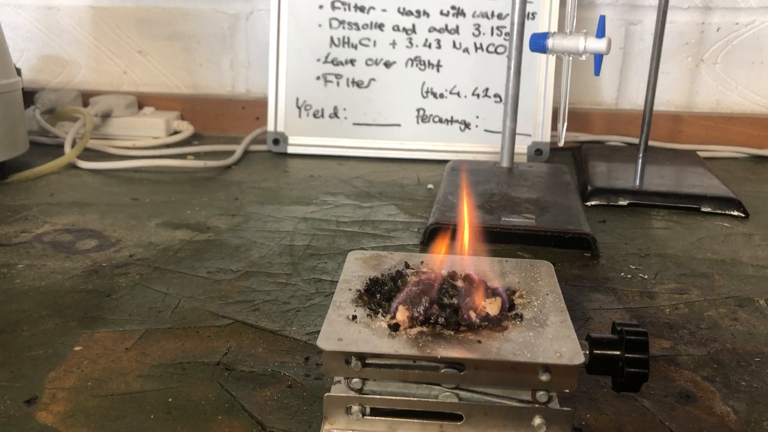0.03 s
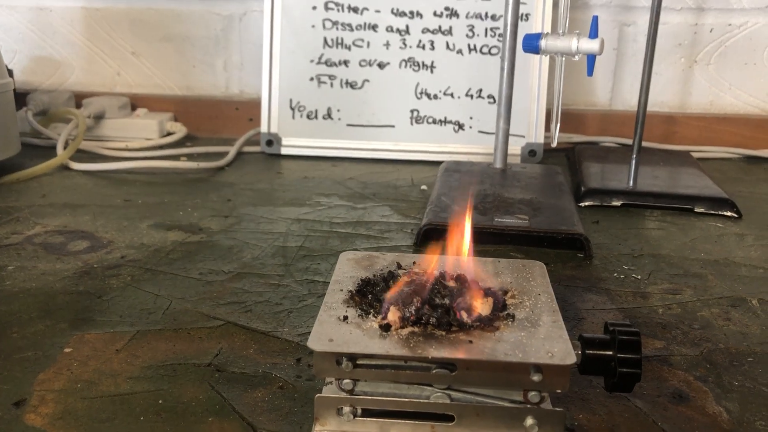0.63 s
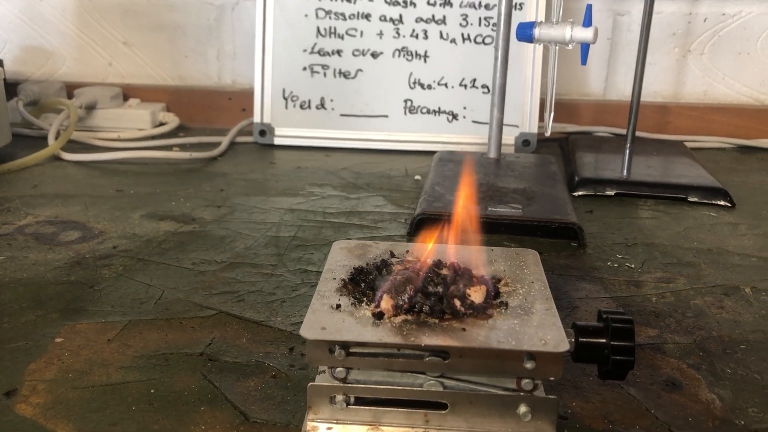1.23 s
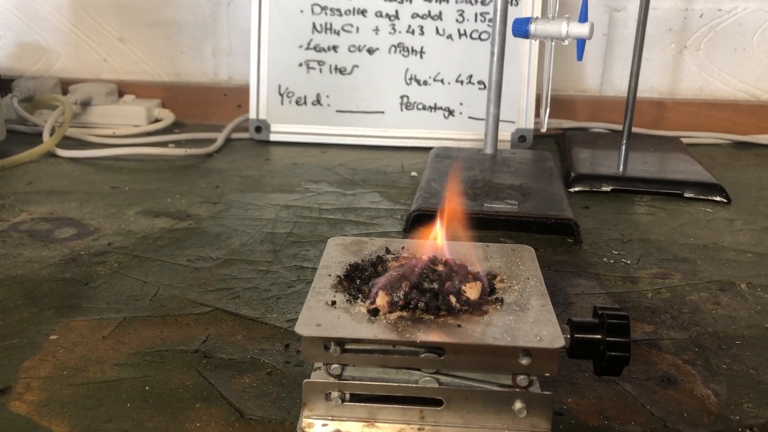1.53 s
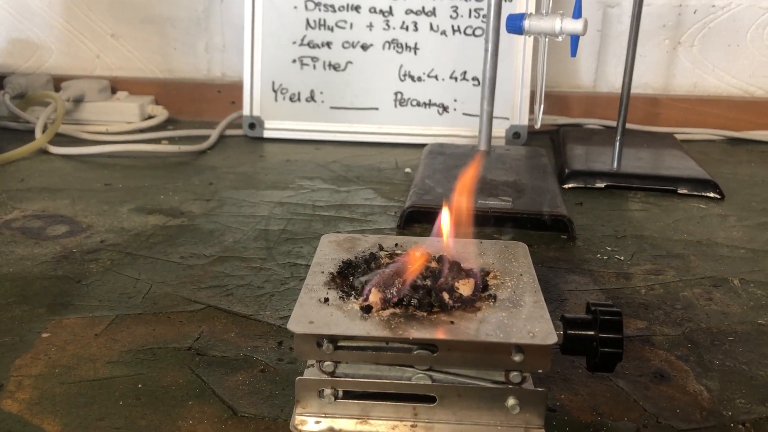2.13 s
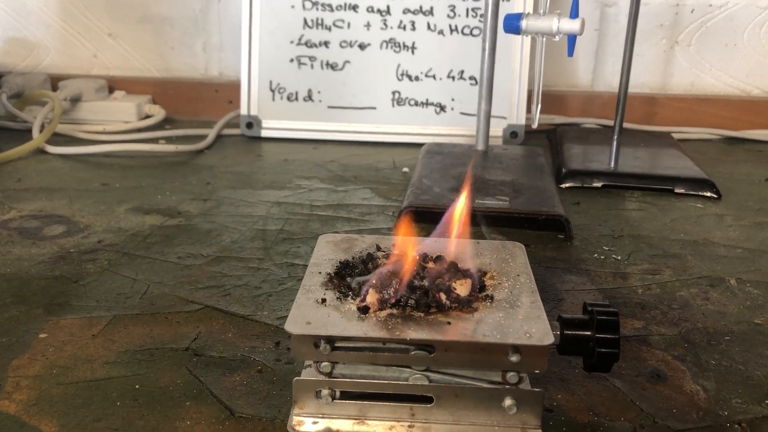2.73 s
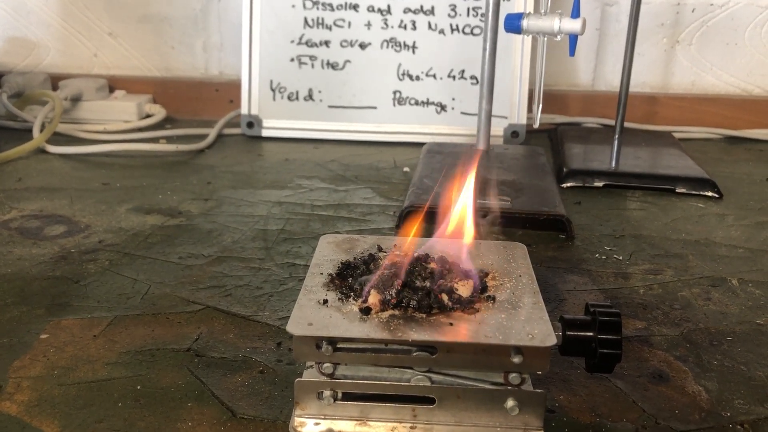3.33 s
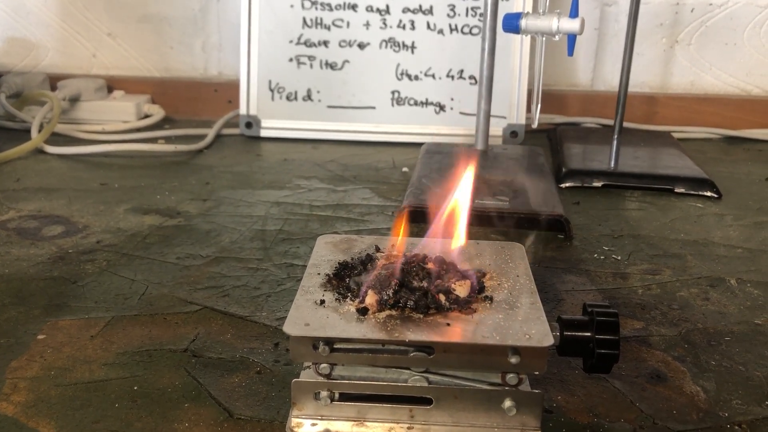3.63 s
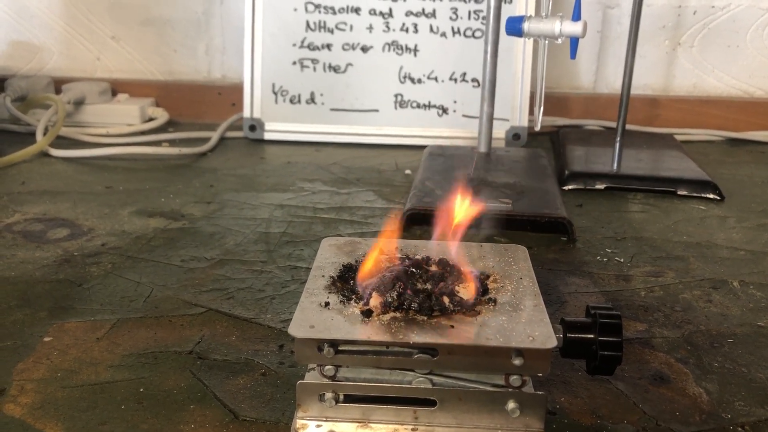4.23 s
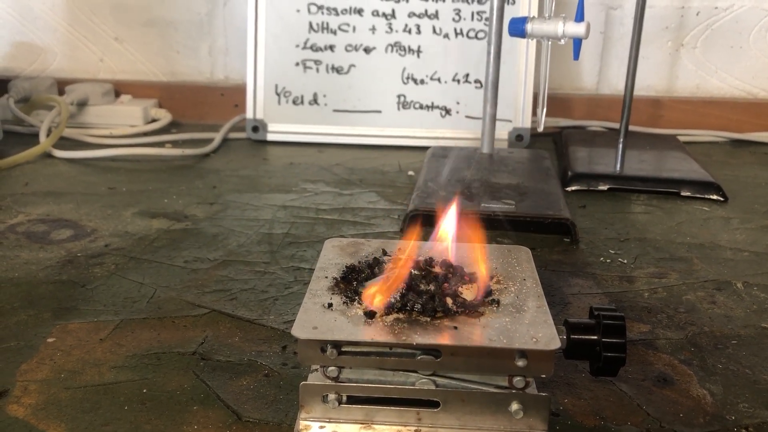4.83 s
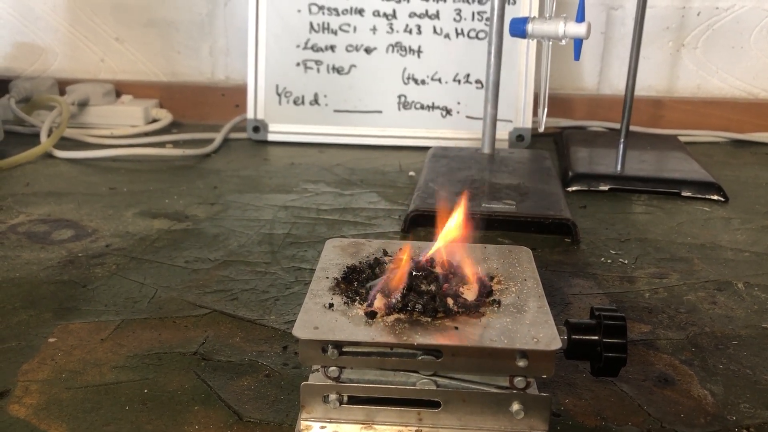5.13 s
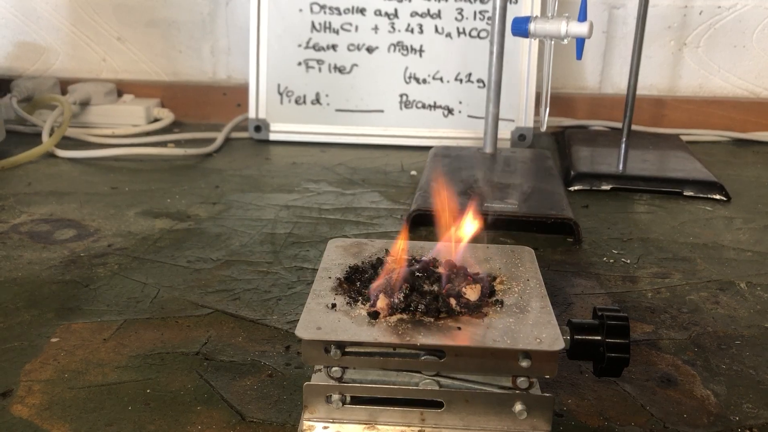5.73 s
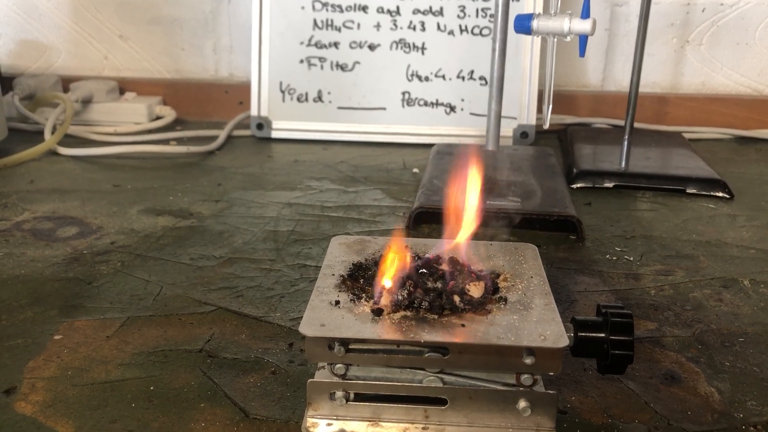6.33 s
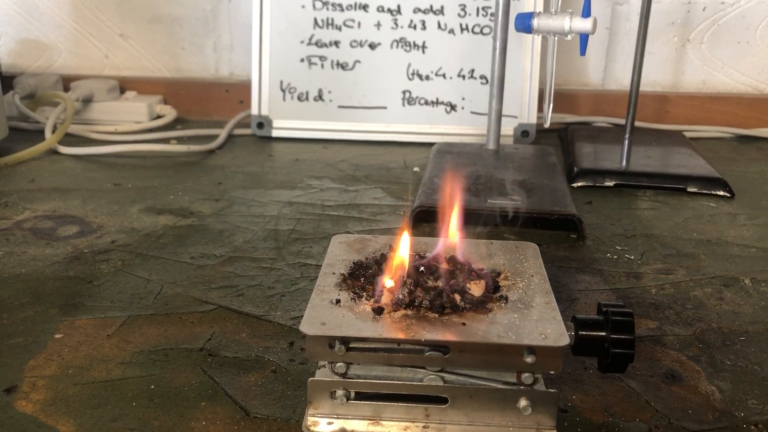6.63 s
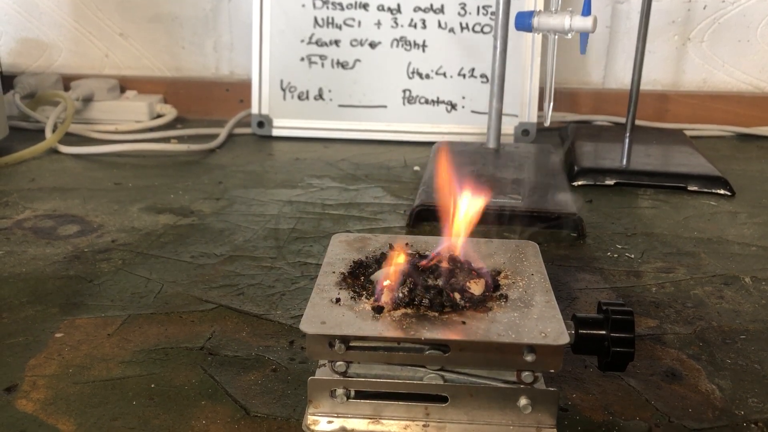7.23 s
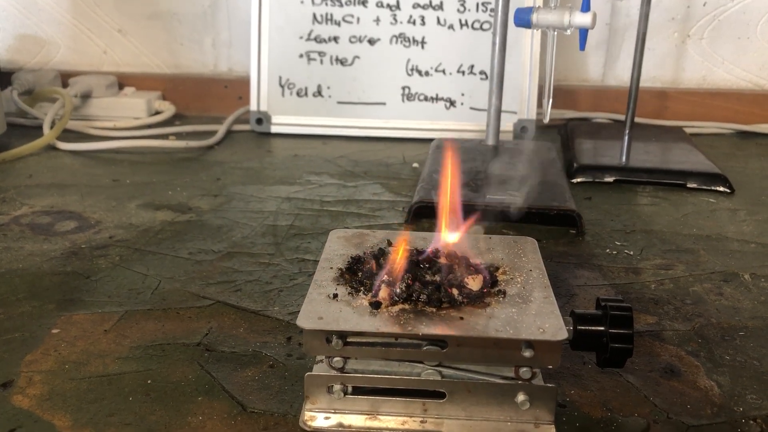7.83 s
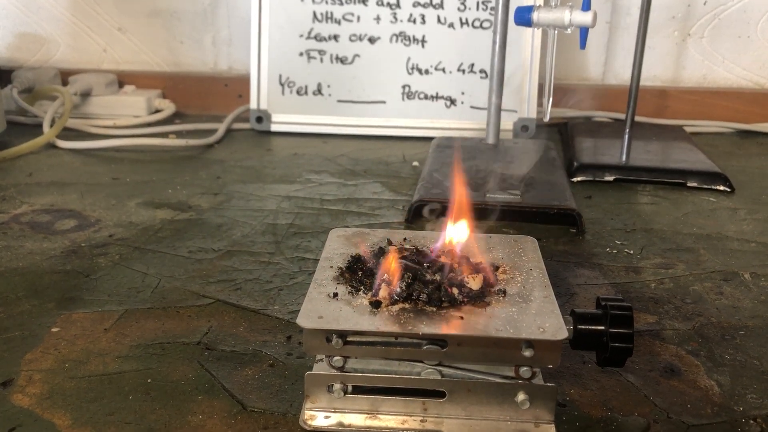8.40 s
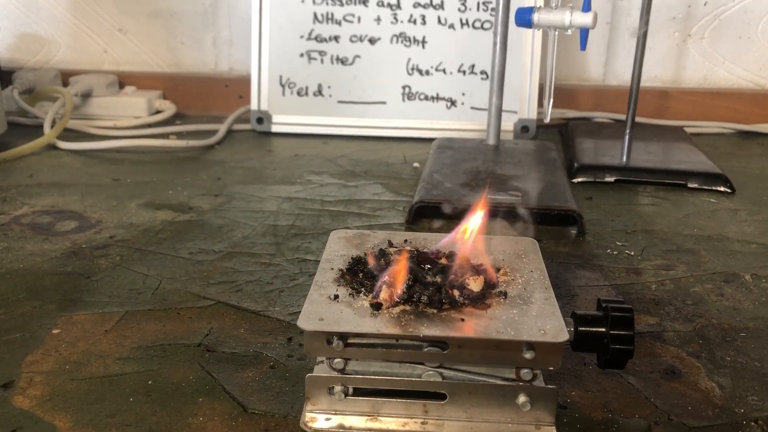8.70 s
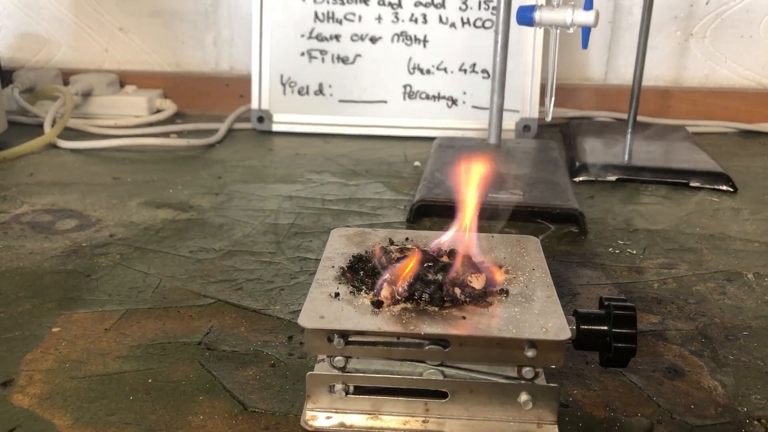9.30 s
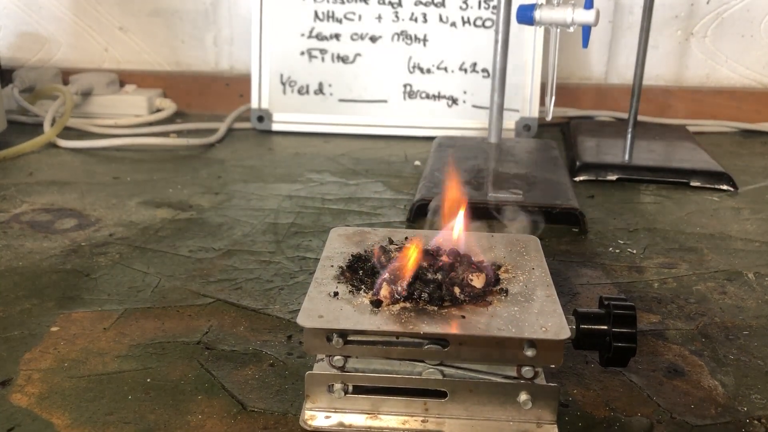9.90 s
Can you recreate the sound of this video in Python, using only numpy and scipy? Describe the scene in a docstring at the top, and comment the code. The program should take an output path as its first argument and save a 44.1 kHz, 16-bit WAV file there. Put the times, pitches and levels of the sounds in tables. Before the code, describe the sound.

A small heap of chemical mix burns on a metal plate in a lab, heard close up. It starts with a faint fizz and a few scattered snaps, then catches and sputters in quick, irregular hissing spurts mixed with dry crackles and tiny ticks. The flame flaps softly underneath, over quiet ventilation and a low hum.

```python
"""Pyrotechnic mix burning on a bench

A small heap burns on a metal plate in a lab, close up. Gas seeps through the melting crust as a fine
fizz and breaks out in short hissing spurts; grains snap in the heat, the crust ticks and the flame
flaps softly. The bench, a board and the walls answer, over quiet ventilation and a low hum."""
import sys
import numpy as np
from scipy import signal
from scipy.fft import rfft, irfft, next_fast_len
from scipy.io import wavfile
from scipy.ndimage import uniform_filter1d, map_coordinates

SR = 44100
rng = np.random.default_rng(int(sys.argv[2]) if len(sys.argv) > 2 else 0)


def dump_mix(stems):
    """Bounce the given channels to the path in sys.argv[1] as a 16-bit WAV at rate SR."""
    frames = np.atleast_2d(stems).T  # one column per channel
    limited = np.clip(frames, -1, 1)  # hard clip at full scale
    pcm = np.round(limited * 32767).astype(np.int16)
    wavfile.write(sys.argv[1], SR, pcm)


N = 439236

# Cue and fader levels are relative: each layer adds its own trim.
# ventilation EQ: freq_hz, gain_db
AIR_EQ = [(15, -49), (26, -17), (37, 6), (55, -4), (85, -8.5), (140, -8), (245, -2), (400, -17), (1000, -9),
          (1500, -19.5), (2700, -27.5), (4700, -20.5), (7000, -25), (11500, -17), (16000, -26)]
# fader ride of the hum: time_s, level_db
HUM_RIDE = [(0.0, -82.5), (1.5, -77.5), (7.0, -75.5), (8.0, -80)]
# the flame's murmur, growing as the heap catches: time_s, level_db
MURMUR_RIDE = [(0.0, -70.5), (1.1, -71), (1.9, -63), (2.7, -67), (4.4, -64.5), (9.96, -63.5)]
# murmur EQ: freq_hz, gain_db
MURMUR_EQ = [(20, -55), (55, -5), (120, -4), (155, -1.5), (190, -4), (270, 0), (375, -8), (475, -4),
             (680, -8.5), (1100, -5.5), (1500, -13.5), (2300, -12.5), (6000, -60)]
# soft flaps of the flame: time_s, level_db
FLAP_CUES = [(0.28, -51.5), (0.574, -54), (1.18, -50.5), (1.565, -55), (2.307, -48), (2.557, -52),
             (3.21, -49.5), (4.297, -44.5), (5.644, -45.5), (7.813, -45), (8.498, -52), (9.431, -50)]
# dull flap EQ: freq_hz, gain_db
FLAP_EQ = [(20, -32), (45, -7), (110, -5), (280, 6.5), (1000, -13.5), (3000, -66)]
# gas flow as the heap smoulders, catches, then burns unevenly: time_s, level_db
FLOW_RIDE = [(0.0, -75.5), (1.55, -74.5), (1.73, -63), (1.98, -61), (2.33, -66.5), (2.85, -61.5),
             (3.2, -57.5), (3.55, -57.5), (3.72, -58), (4.25, -59), (4.6, -54.5), (5.0, -64.5),
             (5.35, -54.5), (6.0, -57.5), (6.7, -55.5), (7.3, -54.5), (7.53, -58), (7.8, -51.5),
             (8.05, -59.5), (8.45, -55), (8.95, -62.0), (9.4, -61.5), (9.96, -62.5)]
# bright EQ of escaping gas: freq_hz, gain_db
JET_EQ = [(60, -56), (500, -26.5), (1500, -14.5), (1900, -8), (2700, -7.5), (3200, -0.5), (4900, 0.5),
          (6500, -7), (8200, -1.5), (10000, 2.5), (11500, 1), (13300, -2.5), (15500, -2)]
# gas spurts: peak_s, level_db, rise_s, drain_s, puff_over_hiss_db, treble_over_mids_db
SPURT_CUES = [(0.205, -58.0, 0.008, 0.37, 1, 2), (1.479, -59.0, 0.053, 0.13, -8, -2.0),
              (1.761, -53.5, 0.02, 0.15, -0.5, -5), (1.801, -56, 0.018, 0.15, -4, -3.5),
              (2.953, -45, 0.002, 0.053, -7.5, 0), (3.063, -42.5, 0.022, 0.06, -5, -7),
              (3.095, -47, 0.005, 0.052, -17, -8), (3.157, -47, 0.028, 0.061, -3.5, -1),
              (3.211, -42.5, 0.0054, 0.15, -7, -4), (3.251, -40.5, 0.0066, 0.12, -8.0, -2.5),
              (3.301, -47.0, 0.016, 0.053, -6.0, -2), (3.372, -39.5, 0.006, 0.079, -10, -2.0),
              (3.427, -43.5, 0.0055, 0.041, -9.0, 4), (3.446, -46, 0.004, 0.05, -13, -5),
              (3.472, -35, 0.007, 0.068, -8.5, 0.5), (3.529, -44.0, 0.006, 0.047, -7.5, -3),
              (3.566, -49.5, 0.02, 0.22, -9.0, 0), (3.621, -50.5, 0.016, 0.12, -6, -2.0),
              (3.773, -46.5, 0.006, 0.044, -7, 1.0), (3.805, -41, 0.0084, 0.035, -12, 3),
              (3.844, -41.5, 0.003, 0.05, -14, -1.5), (3.908, -43.5, 0.012, 0.089, -21, 0),
              (3.96, -45.0, 0.0045, 0.054, -8.0, 2), (4.039, -45.5, 0.0041, 0.2, -12, 1),
              (4.115, -41, 0.0054, 0.034, -10, -1), (4.3, -37.0, 0.0075, 0.14, -4.5, 1),
              (4.394, -36.0, 0.004, 0.12, -9.5, -1.5), (4.426, -44, 0.004, 0.04, -20.0, 2),
              (4.494, -33.5, 0.01, 0.11, -6.5, 4.5), (4.603, -36.5, 0.012, 0.047, -10, 0.0),
              (4.637, -41, 0.004, 0.07, -11.5, 3), (4.706, -37.0, 0.005, 0.11, -9.0, 2),
              (4.75, -26.5, 0.006, 0.034, -19.0, 8.0), (4.853, -47, 0.003, 0.043, -8, -1.0),
              (4.939, -47.5, 0.016, 0.11, -21, -1), (5.046, -38.0, 0.0064, 0.18, -17, 2),
              (5.128, -45.0, 0.005, 0.037, -7, -2.0), (5.225, -41, 0.041, 0.049, -6, -2.5),
              (5.253, -40.5, 0.022, 0.037, -19.0, -2), (5.299, -43.0, 0.002, 0.06, -14, -6),
              (5.31, -39.5, 0.01, 0.13, -10.5, 1), (5.412, -41, 0.003, 0.04, -14.0, -6),
              (5.508, -37.5, 0.005, 0.072, -9, -1.5), (5.557, -41, 0.005, 0.045, -8, -6),
              (5.624, -41.5, 0.004, 0.12, -17, -4), (5.645, -39, 0.007, 0.04, -14, 0),
              (5.708, -38, 0.044, 0.35, -16.5, -1.5), (5.778, -44, 0.003, 0.028, -12.0, -7),
              (5.828, -44, 0.006, 0.19, -11.0, -4.0), (5.871, -47.5, 0.012, 0.19, -17.0, -1.0),
              (5.901, -43, 0.003, 0.06, -21, -3.0), (5.924, -41.0, 0.0033, 0.13, -12, -1.5),
              (5.998, -43.5, 0.003, 0.075, -10, 2), (6.035, -42.0, 0.005, 0.025, -7, -1),
              (6.097, -40.5, 0.0075, 0.038, -6, 2.5), (6.132, -45.5, 0.0056, 0.045, -17, -1.5),
              (6.166, -42, 0.005, 0.083, -14, 1), (6.308, -41, 0.022, 0.064, -3.5, 0),
              (6.387, -41.5, 0.017, 0.16, -24, 0), (6.463, -37.5, 0.0099, 0.37, -14.5, -2.5),
              (6.544, -40.5, 0.004, 0.046, -11.0, -7), (6.587, -41.5, 0.014, 0.036, -11.0, -0.5),
              (6.717, -43.5, 0.012, 0.031, -5.5, -7), (6.788, -46.0, 0.017, 0.085, -9, 0),
              (6.91, -36, 0.059, 0.22, -16.5, -2.5), (7.063, -44.0, 0.0055, 0.18, -14, -2),
              (7.106, -34, 0.006, 0.14, -15, 0), (7.237, -40.0, 0.004, 0.051, -14, -2.0),
              (7.276, -47.5, 0.015, 0.58, -8.5, 1), (7.355, -41.0, 0.004, 0.06, -26.0, -3),
              (7.406, -42.5, 0.0063, 0.097, -3.5, 0), (7.458, -40, 0.017, 0.11, -8.0, -4),
              (7.584, -44.5, 0.0037, 0.17, -17, -5), (7.683, -40.5, 0.0063, 0.07, -13, -2.0),
              (7.705, -43.5, 0.014, 0.71, -12.5, 1), (7.767, -33, 0.025, 0.12, -23.0, 0.5),
              (7.815, -45, 0.005, 0.078, -5, -10), (7.857, -40, 0.022, 0.17, -14.5, -3),
              (7.92, -43.0, 0.015, 0.054, -17.0, 0.0), (7.963, -43.5, 0.0096, 0.1, -13, -5.0),
              (8.032, -50.5, 0.01, 0.21, -9.5, -6), (8.094, -44, 0.01, 0.07, -8, 0),
              (8.106, -40.5, 0.007, 0.11, -7, 2), (8.162, -47.5, 0.004, 0.12, -11, -1.0),
              (8.196, -43.5, 0.009, 0.093, -33.0, 0), (8.235, -48, 0.007, 0.05, -21.0, -2.5),
              (8.275, -44.0, 0.027, 0.09, -26.0, 0), (8.299, -44.5, 0.02, 0.2, -9, -3.0),
              (8.401, -39, 0.0037, 0.12, -13, -2.5), (8.437, -41.5, 0.022, 0.03, -17, -7),
              (8.534, -49, 0.027, 0.065, -6.0, -6), (8.69, -49, 0.022, 0.25, -13, -6),
              (8.72, -41.5, 0.008, 0.073, -2.5, 0), (8.797, -39, 0.01, 0.22, -27, -1.0),
              (8.852, -39.0, 0.0044, 0.053, -19, -4.0), (8.958, -45.5, 0.0028, 0.091, -12.0, -7.0),
              (9.004, -47.0, 0.023, 0.11, -9.0, -4), (9.035, -44.0, 0.015, 0.18, -15, -3),
              (9.147, -43, 0.0071, 0.053, -20.0, -10), (9.198, -47, 0.004, 0.091, -25, 0),
              (9.274, -43, 0.008, 0.037, -6.0, -2.5), (9.437, -48, 0.007, 0.063, -1, -2),
              (9.851, -39.5, 0.0048, 0.59, -18, -3), (9.952, -43, 0.02, 0.068, -29.0, -1)]
# body of the puff under a spurt: freq_hz, gain_db
PUFF_EQ = [(30, -27), (170, -11.5), (300, 5), (385, -11), (475, 5.5), (680, -3), (850, 1), (1150, 1.5),
           (1500, -8.5), (2200, -3), (4000, -20), (9000, -29)]
# the loudest snapping grains and popping blisters: start_s, click_db, crack_db, knock_db
SNAP_CUES = [(0.204, -64, -44.5, -46), (0.2086, -53, -46, -51), (0.2352, -50, -61, -56),
             (0.2398, -63, -67, -54), (0.2447, -44, -53, -58), (0.572, -45, -50, -51),
             (0.7151, -50, -61, -61), (0.7423, -56, -66, -62), (1.3252, -49.5, -51, -61),
             (1.4246, -45, -51.5, -60), (1.4748, -48, -53, -51), (1.5653, -48.5, -58, -52),
             (1.6032, -49, -49, -59), (1.8018, -50, -52, -46), (1.9425, -53, -49, -58),
             (2.0065, -45, -48, -50), (2.0539, -57, -44, -46.5), (2.1567, -63, -50, -47.5),
             (2.8326, -66, -47, -48), (2.9298, -60, -44.5, -51), (2.9549, -45, -39, -44),
             (3.0656, -48, -46, -43), (3.0954, -39, -40, -51), (3.2113, -55, -43, -38.5),
             (3.2238, -38, -44, -56), (3.2537, -45, -44, -39.5), (3.3188, -55, -48, -57),
             (3.3933, -46, -42, -55), (3.4462, -44, -38, -49), (3.507, -36.5, -43, -55),
             (3.5657, -43, -43, -48), (3.6188, -42, -50, -49), (3.844, -40, -49, -54),
             (4.1183, -40, -43, -46), (4.2318, -45, -58, -70), (4.2998, -35, -43, -40),
             (4.3909, -38, -51, -50), (4.4959, -35, -45, -33), (4.6034, -50, -43, -44),
             (4.6711, -41, -45, -62), (4.7069, -37, -35.5, -37.5), (4.746, -39, -49, -48),
             (4.7502, -23.5, -35, -42), (4.7696, -35, -43, -50), (4.9127, -48, -46, -51),
             (4.9247, -42, -44, -59), (5.2978, -41, -46, -47), (5.828, -42, -40.5, -46),
             (5.9241, -43, -40, -54), (6.5778, -43, -58, -48), (6.6223, -36.5, -56, -61),
             (6.6467, -37, -44, -48), (7.8147, -55, -40, -47), (7.8525, -42, -51, -62),
             (7.8955, -45, -56, -61), (8.106, -41, -36.5, -46), (8.8886, -44, -42.5, -51),
             (8.9588, -55, -45, -51), (8.9885, -55, -42, -53), (9.0316, -47, -42, -44),
             (9.093, -61, -44, -53), (9.146, -52, -49, -54), (9.198, -48, -51, -53),
             (9.4349, -56, -40.5, -41), (9.8003, -43.5, -58, -51)]
# a snap's bright click: freq_hz, gain_db
CLICK_EQ = [(40, -64), (300, -54), (1500, -29), (4000, -10), (7000, 3.5), (11000, 13.5), (16000, 0)]
# its dry crack: freq_hz, gain_db
CRACK_EQ = [(300, -14), (1400, -8), (2300, -2.5), (3200, 4.5), (5400, -0.5), (6700, -8), (12000, -13)]
# its hollow knock: freq_hz, gain_db
KNOCK_EQ = [(120, -16.5), (290, 2), (380, -6), (475, 7.5), (700, -0.5), (1100, 1.5), (1600, -16.5),
            (4000, -20.5)]
# early reflections off board, wall and stands: delay_s, gain
REFLECTIONS = [(.00508, .17), (.00617, .18), (.00717, .09), (.0102, .11)]
# decay of the room tail: freq_hz, t60_s
ROOM_DECAY = [(150, 0.54), (1000, 0.33), (5000, 0.092), (15000, 0.1)]

SMOULDER_DB = -70.5  # below this flow the heap only smoulders
FAST_JET_DB, JET_TILT = -46, 0.32  # louder spurts gain top end: dB of lift per dB over


def amp(db):
    """Decibels to gain."""
    return 10 ** (np.asarray(db) / 20)


def unit(x):
    """x at rms 1."""
    return x / np.sqrt(np.mean(x ** 2) + 1e-20)


def along(points, hz):
    """(freq_hz, value) points read on a log axis."""
    freqs, values = np.transpose(points)
    return np.interp(np.log(hz + 1), np.log(freqs + 1), values)


def ride(rows):
    """(time_s, value) points as an automation curve."""
    return np.interp(np.arange(N) / SR, *np.transpose(rows))


def wobble(rate):
    """A smooth random curve, rate knots a second."""
    return map_coordinates(rng.standard_normal(int(N * rate / SR) + 4), [np.arange(N) * rate / SR])


def filtered(x, response):
    """x through a frequency response."""
    size = next_fast_len(N + SR // 2)
    return irfft(rfft(x, size) * response(np.fft.rfftfreq(size, 1 / SR)), size)[:N]


def coloured(x, eq, size=4096):
    """x through a minimum-phase EQ of unit energy."""
    cepstrum = irfft(np.log(amp(along(eq, np.fft.rfftfreq(size, 1 / SR)))))
    cepstrum[1:size // 2] *= 2
    cepstrum[size // 2 + 1:] = 0
    pulse = irfft(np.exp(rfft(cepstrum)))
    return signal.fftconvolve(x, pulse / np.linalg.norm(pulse))[:N]


def add_swell(power, peak_s, db, rise_s, drain_s):
    """Adds to a power envelope: pressure builds to a peak, then drains ever faster, 120 dB in drain_s."""
    first, last = np.clip([round((peak_s - 2 * rise_s) * SR), round((peak_s + drain_s) * SR)], 0, N)
    t = np.arange(first, last) / SR - peak_s
    drop_db = np.where(t < 0, 20 * (t / rise_s) ** 2, 60 * t / drain_s * (1 + t / drain_s))
    power[first:last] += amp(db - drop_db) ** 2


def room_tone(air_db=-67.0, hum_hz=111, waver_rad=1.13):
    """The bed: ventilation and a wavering low hum."""
    phase = 2 * np.pi * hum_hz * np.arange(N) / SR + waver_rad * wobble(11)
    hum = np.sin(phase) * amp(2.4 * wobble(6))
    air = coloured(rng.standard_normal(N), AIR_EQ, size=16384)
    return amp(air_db) * air + amp(ride(HUM_RIDE)) * unit(hum)


def flame(murmur_db=-2, flicker_db=2.5, flap_db=-7, rise_s=0.012, drain_s=0.062):
    """The flame murmurs as it flickers and now and then flaps."""
    flap_power = np.zeros(N)
    for time_s, db in FLAP_CUES:
        add_swell(flap_power, time_s + rise_s / 2, db + flap_db, rise_s, drain_s)
    flicker = amp(ride(MURMUR_RIDE) + murmur_db + flicker_db * wobble(30))
    murmur = flicker * coloured(rng.standard_normal(N), MURMUR_EQ)
    return murmur + np.sqrt(flap_power) * coloured(rng.standard_normal(N), FLAP_EQ)


def pips(rate, spread_db):
    """Impulses of scattered size at random moments, rms 1."""
    chance, size = rng.random(N), np.clip(rng.standard_normal(N), -2, 2)
    return unit((chance < rate / SR) * np.sign(rng.standard_normal(N)) * amp(spread_db * size))


def fizz(rate, spread_db, rush_db=0.5):
    """Tiny bursting pores over the smooth rush of gas."""
    gas = unit(pips(rate, spread_db) + amp(rush_db) * rng.standard_normal(N))
    return coloured(gas, JET_EQ)


def sputter(rate, life_s, depth):
    """A ragged gain, rms near 1: pores snap open at random and each drains away."""
    openings = (rng.random(N) < rate / SR) * np.clip(rng.exponential(size=N), 0, 2)
    bursts = signal.lfilter([1], [1, -np.exp(-1 / (life_s * SR))], openings)
    return np.sqrt(1 - depth + depth * bursts / bursts.mean())


def vented(x, vents_hz=(2400, 3200, 4100, 5200, 7500, 10500, 14000), q=7.9):
    """The gas leaves by ever new cracks, so hissing resonances come and go."""
    for hz in vents_hz:
        ring = signal.lfilter(*signal.iirpeak(hz, q, fs=SR), x)
        x = x + (amp(3 * np.tanh(wobble(16))) - 1) * ring
    return unit(x)


def falling(x, lag_s):
    """A widening puff of gas rings lower and lower: 800 Hz comes lag_s late, the lows later still."""
    return filtered(x, lambda hz: np.exp(-2j * np.pi * lag_s * 1000 * np.log(hz + 200)))


def seepage(trim_db=4.5, crackle_db=-14, popping_db=-14):
    """Seeping gas fizzes, crackles and pops; the more flow, the more it sputters."""
    flow_db = ride(FLOW_RIDE)
    vigour = np.clip((flow_db - SMOULDER_DB) / 13, 0, 1)
    ragged = sputter(rate=50, life_s=.003, depth=.5 * vigour ** 4)
    pores = fizz(rate=2500, spread_db=6.5)
    hiss = ragged * (vigour * vented(pores) + (1 - vigour) * pores)
    crackle = amp(crackle_db) * coloured(pips(rate=66, spread_db=7.0), CLICK_EQ)
    popping = amp(popping_db) * falling(coloured(pips(rate=19, spread_db=5.5), CRACK_EQ), lag_s=.002)
    return amp(flow_db + trim_db) * (hiss + vigour * (crackle + popping))


def paced(x, like, size=600):
    """A pocket holds only so much gas: x keeps its grain but is levelled to the rms of like."""
    return x * np.std(like) / np.sqrt(np.abs(uniform_filter1d(x ** 2, size)) + 1e-12)


def spurts(hiss_db=0.85, puff_db=-4.0, puff_lead_s=0.0033, crossovers_hz=(7000, 12000)):
    """A gas pocket breaks open: hiss over a falling puff. Weak spurts sputter; fast jets run smoother."""
    mid_power, high_power, top_power, puff_power = np.zeros((4, N))
    for peak_s, db, rise_s, drain_s, body_db, treble_db in SPURT_CUES:
        treble_share = 1 / (1 + amp(-treble_db) ** 2)
        high_db = db + 10 * np.log10(2 * treble_share)
        tilt_db = JET_TILT * max(db - FAST_JET_DB, 0)
        add_swell(mid_power, peak_s, db + 10 * np.log10(2 * (1 - treble_share)), rise_s, drain_s)
        add_swell(high_power, peak_s, high_db - tilt_db / 2, rise_s, drain_s)
        add_swell(top_power, peak_s, high_db + tilt_db, rise_s, drain_s)
        add_swell(puff_power, peak_s - puff_lead_s, db + body_db, rise_s * 0.72, drain_s * 1.07)
    jet = amp(hiss_db) * vented(fizz(rate=6000, spread_db=4.5))
    mids, below_top = (filtered(jet, lambda hz: 1 / (1 + (hz / edge) ** 8)) for edge in crossovers_hz)
    weakness = 1 / (1 + (mid_power + high_power) / (2 * amp(FAST_JET_DB) ** 2))
    ragged = sputter(rate=170, life_s=.0012, depth=.15 + .6 * weakness)
    rasp = np.sqrt(mid_power) * paced(ragged * mids, mids)
    sizzle = np.sqrt(high_power) * (below_top - mids) + np.sqrt(top_power) * (jet - below_top)
    puff = amp(puff_db) * np.sqrt(puff_power) * coloured(rng.standard_normal(N), PUFF_EQ)
    return rasp + np.sqrt(ragged) * sizzle + falling(puff, lag_s=.0035)


def snaps(click_db=15.5, crack_db=15.0, knock_db=13.5, colour_db=3, fizz_db=-22, fizz_t60_s=0.017):
    """Each grain splits in its own colour: a sharp click, a fizzy crack and a hollow, falling knock."""
    size = 2048
    clicks, cracks, knocks = tracks = np.zeros((3, N + 4 * size))
    t, split = np.arange(size) / SR, signal.unit_impulse(size)
    for start_s, *levels_db in SNAP_CUES:
        at = round(start_s * SR)
        escape = amp(fizz_db - 60 * t / fizz_t60_s) * rng.standard_normal(size)
        layers = (split, CLICK_EQ), (split + escape, CRACK_EQ), (split, KNOCK_EQ)
        for track, db, (push, eq) in zip(tracks, levels_db, layers):
            own_eq = [(hz, gain_db + colour_db * rng.standard_normal()) for hz, gain_db in eq]
            track[at:at + size] += amp(db) * coloured(push, own_eq)[:size]
    return (amp(click_db) * clicks[:N]
            + amp(crack_db) * falling(cracks[:N], lag_s=.0009)
            + amp(knock_db) * falling(knocks[:N], lag_s=.0022))


def crust_ticks(rate=28, pitch_hz=4200, spread_oct=0.5, t60_s=0.0047, over_flow_db=10.5, scatter_db=6):
    """Once the heap is alight, flakes of crust crack at random; each rings briefly at its own pitch."""
    size = 512
    track, t, flow_db = np.zeros(N + size), np.arange(size) / SR, ride(FLOW_RIDE)
    for when, pitch, strength in rng.random((round(rate * N / SR), 3)):
        at = int(when * N)
        hz = pitch_hz * 2 ** (spread_oct * (2 * pitch - 1))
        db = flow_db[at] + over_flow_db + scatter_db * (2 * strength - 1)
        if flow_db[at] > SMOULDER_DB:
            track[at:at + size] += amp(db - 60 * t / t60_s) * np.sin(2 * np.pi * hz * t)
    return track[:N]


def lab(x, clutter_db=-11, clutter_t60_s=0.056, low_cut_hz=1500, tail_db=-17):
    """The space: early reflections, scatter off the things on the bench and a short room tail."""
    hz, t, noise = signal.stft(rng.standard_normal(SR // 2), SR, nperseg=256)
    decay = amp(-60 * t / along(ROOM_DECAY, hz)[:, None])
    tail = signal.istft(noise * decay, SR, nperseg=256)[1]
    age = np.arange(len(tail)) / SR
    early = rng.standard_normal(len(age)) * amp(-60 * age / clutter_t60_s) * (age > .001)
    early *= amp(clutter_db) / np.linalg.norm(early)
    for delay_s, gain in REFLECTIONS:
        early[round(delay_s * SR)] += gain
    # small surfaces return only short waves
    early = signal.lfilter(*signal.butter(1, low_cut_hz, "high", fs=SR), early)
    return x + signal.fftconvolve(x, early + amp(tail_db) * tail / np.linalg.norm(tail))[:N]


def scene():
    """The mono mix: the burning heap in the lab, over room tone."""
    heap = spurts() + seepage() + crust_ticks() + snaps() + flame()
    return (lab(heap) + room_tone())[None]


def record(dry, top_hz=15950):
    """A brick-wall high cut on the mix."""
    return filtered(dry[0], lambda hz: hz < top_hz)[None]


dry = scene()
out = record(dry)
dump_mix(out)
```